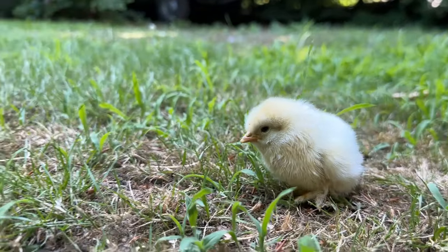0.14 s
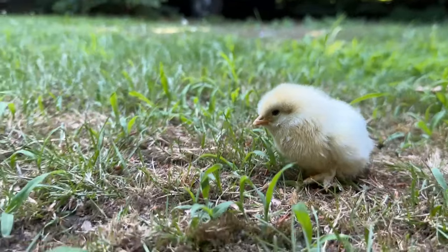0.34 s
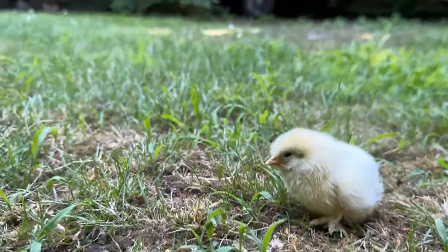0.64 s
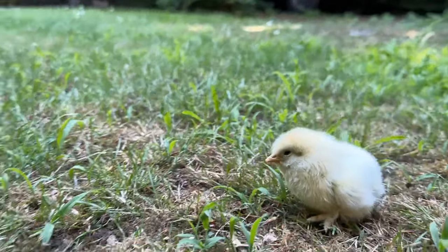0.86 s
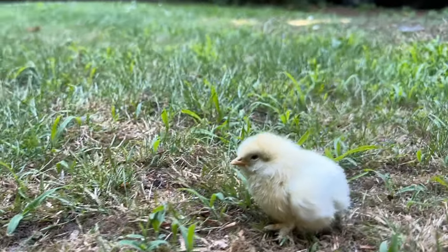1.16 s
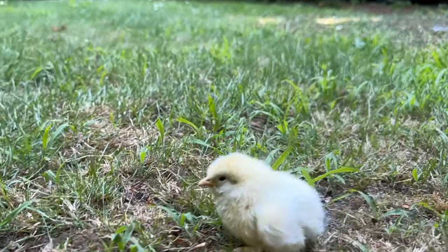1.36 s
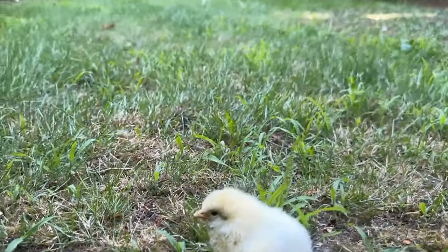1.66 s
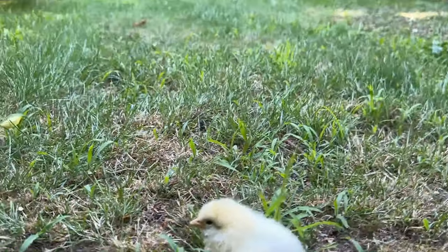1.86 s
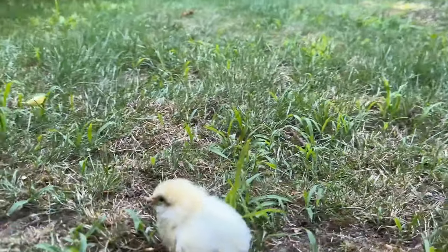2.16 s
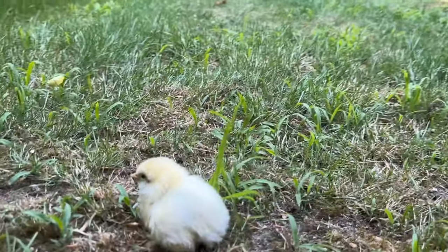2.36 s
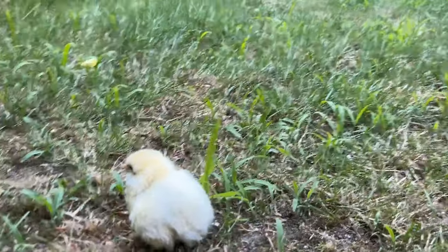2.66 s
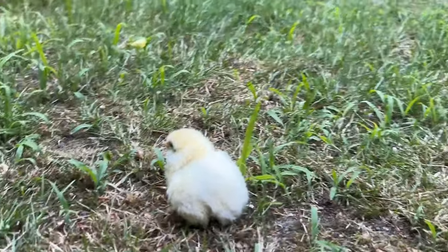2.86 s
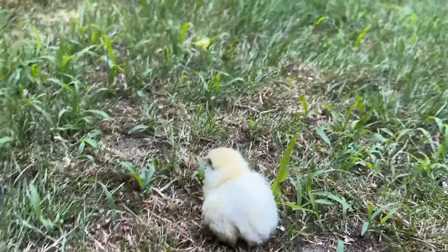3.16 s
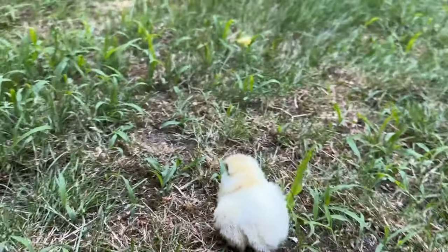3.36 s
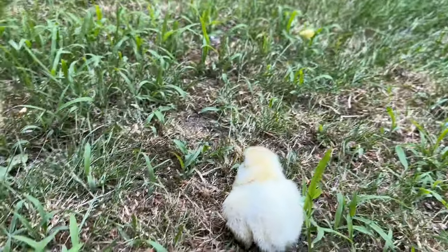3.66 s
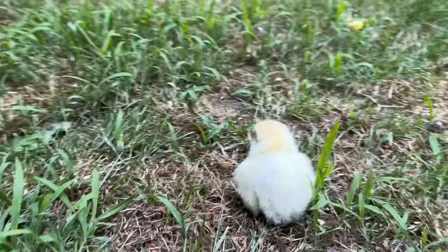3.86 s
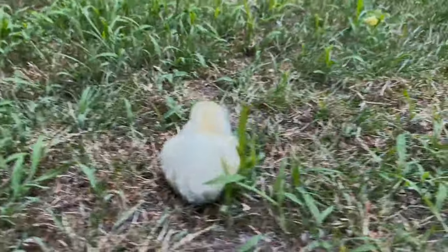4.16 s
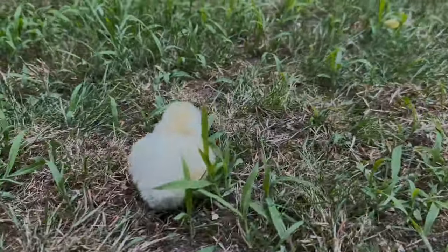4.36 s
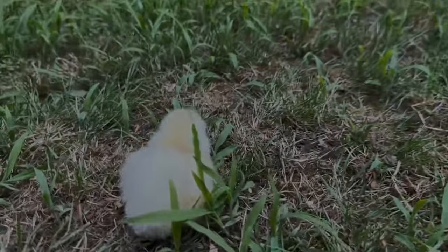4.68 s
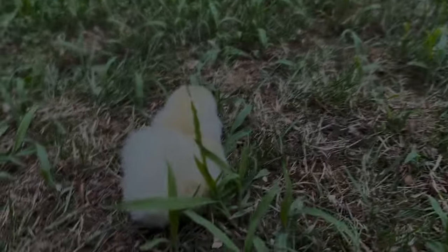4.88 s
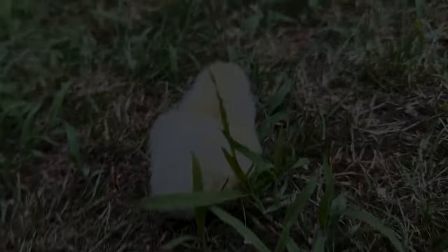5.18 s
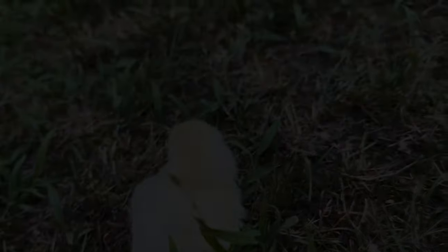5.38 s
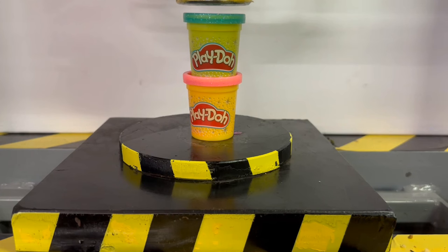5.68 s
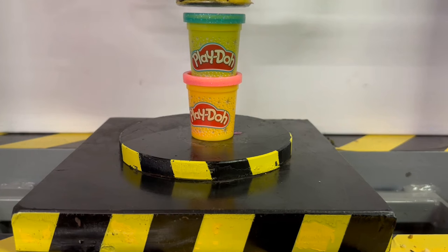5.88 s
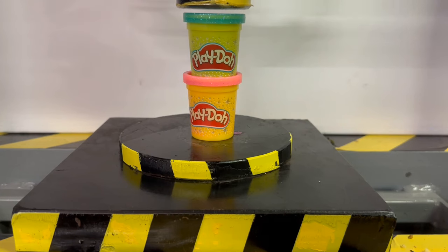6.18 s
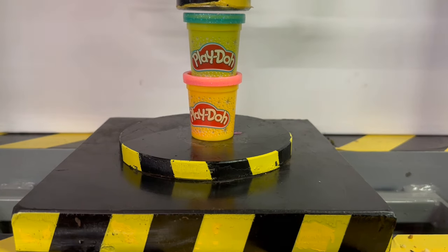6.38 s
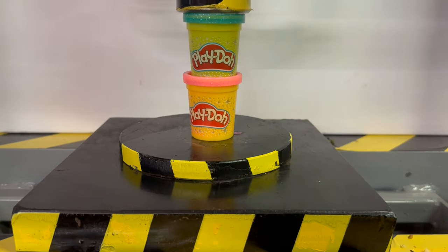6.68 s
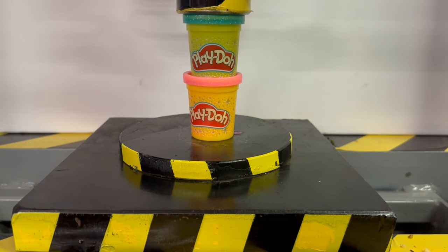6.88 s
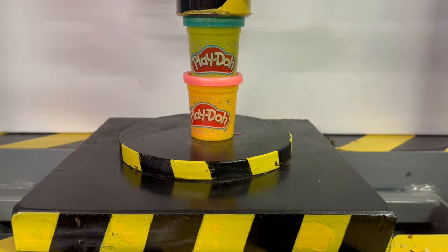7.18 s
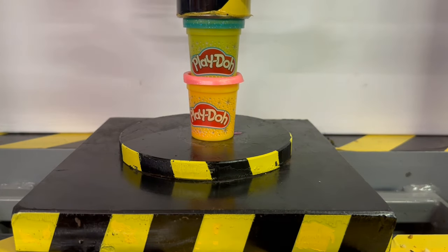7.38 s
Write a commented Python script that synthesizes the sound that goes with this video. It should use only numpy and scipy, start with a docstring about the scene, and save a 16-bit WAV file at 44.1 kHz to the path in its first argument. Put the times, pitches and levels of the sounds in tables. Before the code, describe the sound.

A chick peeps faintly over soft footsteps in grass and distant birds, then a hydraulic press suddenly runs with a loud, steady hum.

```python
"""A chick, then a hydraulic press

A chick peeps on a lawn, its syrinx gliding in pitch; far birds chirp, grass rustles underfoot and a
low outdoor rumble goes on. Then the scene changes at once to a workshop where a hydraulic press runs:
its pump hums at the orders of the shaft, knocks several times a turn into its resonant casing,
and oil hisses through the valves in spurts."""
import sys
import numpy as np
from scipy import signal
from scipy.fft import rfft, irfft
from scipy.io import wavfile

SR = 44100
rng = np.random.default_rng(int(sys.argv[2]) if len(sys.argv) > 2 else 0)


def dump_mix(stems):
    """Bounce the given channels to the path in sys.argv[1] as a 16-bit WAV at rate SR."""
    frames = np.atleast_2d(stems).T  # one column per channel
    limited = np.clip(frames, -1, 1)  # hard clip at full scale
    pcm = np.round(limited * 32767).astype(np.int16)
    wavfile.write(sys.argv[1], SR, pcm)


N = 332514
TIME = np.arange(N) / SR
PRESS_ON_S = 5.713
LOAD = np.clip((TIME - PRESS_ON_S) / (TIME[-1] - PRESS_ON_S), 0, 1)   # on the pump: 0 idle, 1 loaded
SIDES = np.array([[1], [-1]])   # left, right


def from_db(db):
    """Amplitude ratio of a level: a factor of ten per 20 dB."""
    return 10 ** (np.asarray(db) / 20)


def rms_one(x):
    """Normalisation to unit rms."""
    return x / np.sqrt(np.mean(x ** 2) + 1e-20)


def in_time(rows):
    """Linear interpolation in time, one curve per column after the first."""
    s, *columns = np.transpose(rows)
    return [np.interp(TIME, s, c) for c in columns]


def at_hz(points, hz):
    """Interpolation on a logarithmic frequency axis."""
    known_hz, values = np.transpose(points)
    return np.interp(np.log(hz + 1e-9), np.log(known_hz), values)


def drift(corner_hz):
    """Random modulation: low-passed Gaussian noise of unit rms."""
    r = np.exp(-80 * np.pi * corner_hz / SR)   # computed at SR / 40
    slow = signal.lfilter([1], [1, -2 * r, r * r], rng.standard_normal(N // 40 + 2002))[2000:]
    return np.interp(np.arange(N) / 40, np.arange(len(slow)), rms_one(slow))


def swell(s, rise_s, fall_s):
    """Gaussian envelope with separate widths before and after its peak."""
    return np.exp(-((TIME - s) / np.where(TIME < s, rise_s, fall_s)) ** 2 / 2)


def strokes(rows, rest_db):
    """Incoherent addition: the powers of overlapping swells sum above a resting level."""
    power = sum((from_db(db) * swell(s, rise_s, fall_s)) ** 2 for s, rise_s, fall_s, db in rows)
    return np.sqrt(from_db(rest_db) ** 2 + power)


def resonate(x, hz, width_hz):
    """A damped second-order resonator with unit peak gain."""
    r = np.exp(-np.pi * width_hz / SR)
    feedback = [1, -2 * r * np.cos(2 * np.pi * hz / SR), r * r]
    return signal.lfilter(np.array([1, 0, -1]) * (1 - r * r) / 2, feedback, x + 1e-18)


def noise(spectrum, correlation, grain_db=0, crackle=0, lag_ms=0):
    """Partly coherent stereo noise of rms about 1, with optional grain and random cracks."""
    hz = np.fft.rfftfreq(N, 1 / SR)
    cracks = crackle * (rng.random(N) < 60 / SR)
    grit = rng.standard_normal((2, N)) * (from_db(grain_db * drift(180)) + cracks)
    mid, side = rfft(grit) * from_db(at_hz(spectrum, hz))
    alike = np.clip(at_hz(correlation, hz), -.95, .99)
    mid, side = mid * np.sqrt(1 + alike), side * np.sqrt(1 - alike)
    pair = irfft([mid + side, (mid - side) * np.exp(-2j * np.pi * hz * lag_ms / 1000)], N)
    return pair / np.std(pair.mean(axis=0))


def echoes(x, t60):
    """Diffuse reverberation: convolution with decaying noise, independent at each ear."""
    t = TIME[:SR // 2]
    tail = rng.standard_normal((2, len(t))) * from_db(-60 * t / t60)
    return signal.fftconvolve(np.atleast_2d(x), tail / np.sqrt(np.sum(tail[0] ** 2)), axes=1)[:, :N]


def add(out, s, sound):
    """Superposition of a sound starting at time s."""
    at = max(round(s * SR), 0)
    out[at:at + len(sound)] += sound[:N - at]


def place(x, pan_db, lag_ms):
    """Interaural level and time differences: positive is louder and earlier on the left."""
    delayed = np.interp(TIME - lag_ms / 1000, TIME, x)
    return np.array([x, delayed]) * from_db(SIDES * pan_db / 2)


def note(hz, db):
    """A tapered sine whose phase is the integral of its frequency."""
    return from_db(db) * signal.windows.tukey(len(hz), .5) * np.sin(2 * np.pi * np.cumsum(hz) / SR)


# Sound field on the lawn: f/Hz, interaural correlation
LAWN_CORRELATION = [(60, 0.99), (400, 0.55), (1500, 0.25), (12000, 0.019)]
# Outdoor rumble and far hiss: f/Hz, relative spectral density/dB
RUMBLE_SPECTRUM = [(20, -21), (42, -8), (63, 3), (95, -11.5), (125, -6.5), (190, -19), (450, -25),
                   (1000, -39), (2200, -31), (5000, -49)]
def rumble(start_db=-53, rise_db_per_s=0.54):
    """Slowly growing noise, coherent between the ears at long wavelengths."""
    return from_db(start_db + rise_db_per_s * TIME) * noise(RUMBLE_SPECTRUM, LAWN_CORRELATION)


# Two-note chirps: t/s, duration/s, upper f/Hz, lower f/Hz, source level/dB
BIRD_CHIRPS = [(0, 0.052, 4470, 3350, -58.5), (0.106, 0.048, 5800, 4650, -57.5),
               (0.59, 0.092, 4450, 3250, -54.5), (1.219, 0.095, 4310, 3490, -53.5),
               (2.301, 0.088, 3980, 3200, -54), (3.438, 0.056, 4100, 4000, -53.5),
               (3.675, 0.085, 4400, 3390, -58), (3.965, .08, 4450, 3150, -55),
               (4.282, 0.083, 4450, 3300, -59), (4.968, 0.091, 4480, 3450, -59),
               (5.158, .097, 4200, 3370, -58), (5.451, .065, 4800, 3460, -59)]
# Whistles of other birds: t/s, duration/s, start f/Hz, end f/Hz, source level/dB
BIRD_WHISTLES = [(3.443, 0.043, 2400, 3750, -50.5), (3.485, .045, 2800, 3450, -54),
                 (3.548, 0.087, 2166, 2160, -50.5), (3.92, 0.136, 1813, 1875, -63.5),
                 (4.14, .12, 1940, 2380, -55.5)]
def far_birds(step_at=.5, step_width=0.182, rasp_depth=0.0664, direct_db=-3):
    """Frequency-modulated tones, stepping down or gliding, reverberate among the trees."""
    chirps, whistles = np.zeros((2, N))
    rasp = 1 + rasp_depth * drift(285)
    for s, length, upper_hz, lower_hz, db in BIRD_CHIRPS:
        u = np.linspace(0, 1, int(length * SR))
        stepped = (1 + np.tanh((u - step_at) / step_width)) / 2
        hz = upper_hz + (lower_hz - upper_hz) * stepped
        add(chirps, s, note(hz * rasp[int(s * SR):][:len(u)], db))
    for s, length, start_hz, end_hz, db in BIRD_WHISTLES:
        add(whistles, s, note(np.geomspace(start_hz, end_hz, int(length * SR)), db))
    trees = echoes(from_db(2.5) * chirps + from_db(-4) * whistles, t60=0.44)
    return from_db(direct_db) * (chirps + whistles) + trees


# Dead grass: f/Hz, relative spectral density/dB
THATCH_SPECTRUM = [(150, -5.5), (400, -1.5), (900, 2.5), (1800, 1.5), (2700, -3.5), (4500, -4.5),
                   (8000, -33)]
# Feet pressing it: peak t/s, rise/s, fall/s, relative level/dB
THATCH_TREADS = [(1.83, 0.055, 0.1, -51), (2.17, 0.062, 0.044, -64), (3.05, 0.13, 0.1, -60),
                 (3.59, 0.032, 0.023, -61.5), (3.87, 0.013, 0.017, -62), (4.3, 0.038, .05, -60.5),
                 (4.845, 0.02, 0.081, -60.5)]
def thatch(stir_db):
    """Amplitude-modulated crackling noise: dead grass crunches under each tread."""
    crunch = noise(THATCH_SPECTRUM, LAWN_CORRELATION, grain_db=2.0, crackle=9.7, lag_ms=0.19)
    return strokes(THATCH_TREADS, stir_db) * from_db(2.5) * crunch


# Grass blades, with clothing hiss at the top: f/Hz, relative spectral density/dB
BRUSH_SPECTRUM = [(1500, -10), (3200, -3), (5500, 6), (8000, 2.5), (10000, -9), (14000, -9)]
# Brushing strokes: peak t/s, rise/s, fall/s, relative level/dB, clothing hiss gain/dB
BRUSH_STROKES = [(1.23, 0.057, 0.064, -68, 5), (1.61, 0.042, 0.031, -65, 8), (1.86, 0.087, 0.13, -53, -13),
                 (1.98, 0.033, 0.044, -61, -14), (2.15, 0.034, 0.077, -63.5, 9.5),
                 (2.49, 0.075, .06, -72.5, 17), (2.84, 0.064, 0.043, -47.5, -0.5),
                 (3.02, 0.12, .25, -64.5, 12), (3.331, .02, 0.015, -54, 6), (3.6, 0.054, 0.073, -69.5, 20),
                 (3.7, 0.028, 0.017, -59.5, 14), (3.87, 0.035, 0.022, -61, 8), (4.3, 0.026, .045, -61, 17),
                 (4.66, 0.25, 0.16, -67.5, 15), (4.93, 0.095, 0.088, -60.5, 8),
                 (5.19, 0.092, 0.15, -64.5, 9)]
def brushing(stir_db, stir_hiss_db=2, hiss_above_hz=9300):
    """Friction noise: brushed grass swishes, with a high hiss of clothing or handling on each stroke."""
    friction = from_db(1) * noise(BRUSH_SPECTRUM, LAWN_CORRELATION, grain_db=1.5, crackle=6, lag_ms=0.206)
    hiss = signal.sosfiltfilt(signal.butter(4, hiss_above_hz, "high", fs=SR, output="sos"), friction)
    grass_gain = strokes([row[:-1] for row in BRUSH_STROKES], stir_db)
    hiss_rows = [(*timing, db + hiss_db) for *timing, db, hiss_db in BRUSH_STROKES]
    return grass_gain * (friction - hiss) + strokes(hiss_rows, stir_db + stir_hiss_db) * hiss


# Shoe scrapes: peak t/s, spread/s, f/Hz, bandwidth/Hz, level/dB
SOLE_SCUFFS = [(1.739, 0.019, 1750, 490, -45.5), (1.82, 0.017, 1790, 490, -40),
               (3.07, 0.21, 1080, 603, -52.5), (3.16, 0.017, 796, 600, -48)]
def scuffs(grain_db=3.5):
    """Sliding friction of a sole on dry ground gives a band of gritty noise."""
    out = np.zeros(N)
    for s, spread_s, hz, width_hz, db in SOLE_SCUFFS:
        grit = rng.standard_normal(N) * from_db(grain_db * drift(64))
        scrape = resonate(resonate(grit, hz, width_hz), hz, 2 * width_hz)
        out += from_db(db) * swell(s, spread_s, spread_s) * rms_one(scrape)
    return out


# Breaking stalks: t/s, peak level/dB, f/Hz, bandwidth/Hz, left minus right/dB
STALK_SNAPS = [(1.81, -40, 1800, 700, -3), (1.847, -42, 1100, 1800, -2), (2.001, -37, 1400, 1400, -12),
               (2.815, -40, 6580, 2500, 2), (2.945, -41, 1600, 1200, -2), (3.147, -40, 990, 400, -3),
               (4.529, -47, 1300, 2000, 0), (4.84, -38, 1100, 1800, 8), (4.854, -44, 1500, 3000, 2),
               (4.949, -38, 6500, 5000, 6), (4.961, -26.5, 6500, 1700, 10), (4.962, -42, 1200, 1400, -4),
               (5.084, -45, 6550, 6950, 9), (5.166, -41.5, 5040, 2500, 13), (5.306, -40.5, 6800, 2500, 11)]
def snaps(burst_s=.0015, tick=.35, ground_db=-8):
    """Brittle fracture of dry stalks: an impulse and a burst of grit excite a resonance."""
    out, t = np.zeros((2, N)), TIME[:SR // 4]
    for s, db, hz, width_hz, pan_db in STALK_SNAPS:
        burst = rng.standard_normal(len(t)) * np.exp(-t / burst_s)
        sound = resonate(burst + tick * (t == 0) * np.sqrt(SR / hz), hz, width_hz)
        for ear, side in zip(out, (1, -1)):
            add(ear, s, from_db(db + side * pan_db / 2) * sound / np.abs(sound).max())
    return out + from_db(ground_db) * echoes(out, t60=0.018)


# Steps: t/s, initial level/dB, f/Hz
SOIL_THUDS = [(3.251, -39, 213), (3.344, -34, 89.5), (5.327, -39.5, 280), (5.611, -33, 91)]
def footfalls(decay_cycles=1.5):
    """Heavily damped oscillation: soft soil answers each step with a dull thud."""
    out, t = np.zeros(N), TIME[:SR // 4]
    for s, db, hz in SOIL_THUDS:
        add(out, s, from_db(db) * np.exp(-t * hz / decay_cycles) * np.sin(2 * np.pi * hz * t))
    return out


# Stirring between strokes: t/s, relative thatch level/dB, relative brushing level/dB
GRASS_STIR = [(0, -77.5, -73.5), (.95, -70.5, -77.5), (1.3, -71.5, -71.5), (2.35, -70, -72.5),
              (2.6, -65.5, -63), (3.45, -62, -62), (4.1, -66, -69), (4.9, -65.5, -87), (5.65, -71.5, -69.5)]
def lawn(cross_s=2.2, pan_db=0.6):
    """Superposition of the sounds of walking and the outdoor rumble."""
    thatch_db, brushing_db = in_time(GRASS_STIR)
    grass = thatch(thatch_db) + brushing(brushing_db) + place(scuffs(), pan_db=-5, lag_ms=0.18)
    grass = np.where(TIME < cross_s, grass[::-1], grass)   # the feet pass to the other side
    return (rumble() + grass + snaps() + footfalls()) * from_db(SIDES * pan_db / 2)


# Peeps: t/s, duration/s, start f/Hz, top f/Hz, end f/Hz, level/dB, second voice re first/dB,
# skew (below 1 the top comes earlier)
CHICK_PEEPS = [(0.274, 0.055, 2330, 2920, 2080, -50, -5, 0.88),
               (0.445, 0.032, 2630, 2800, 2330, -56.5, -11, 1),
               (.818, 0.077, 2380, 3110, 2070, -52, -5.5, 0.92),
               (1.018, 0.057, 2920, 3480, 2370, -47.5, -27, 1.03),
               (1.311, 0.075, 2900, 3546, 2300, -44, -35, 0.97),
               (1.554, 0.076, 3120, 3485, 2500, -45.5, -35, 1.1),
               (1.909, 0.085, 3120, 3620, 2370, -43.5, -35, 1.44),
               (2.18, 0.092, 2900, 3650, 2230, -47, -35, 1.2)]
def chick(second_ratio=1.21, overtone_db=-15, falloff_db=-5, waver=0.012, flatness=2.4, softness=0.66):
    """Two-voice phonation: peeps arch in pitch, the syrinx's other side joining in the first ones."""
    out, wobble = np.zeros(N), 1 + waver * drift(170)
    for s, length, start_hz, top_hz, end_hz, db, second_db, skew in CHICK_PEEPS:
        u = np.linspace(0, 1, int(length * SR)) ** skew
        rise, fall = np.abs([top_hz - start_hz, top_hz - end_hz]) ** (1 / flatness)
        arch_hz = top_hz - np.abs(u * (rise + fall) - rise) ** flatness
        hz = arch_hz * wobble[int(s * SR):][:len(u)]
        phase = 2 * np.pi * np.cumsum(hz) / SR
        voice = np.sin(phase) + from_db(second_db) * np.sin(second_ratio * phase)
        overtones = sum(from_db(overtone_db + falloff_db * k) * np.sin((k + 2) * phase) for k in range(3))
        voice += 2 * u * (hz / top_hz) ** 3 * overtones   # brightest after the top of the arch
        envelope = np.abs(np.sin(np.pi * u)) ** softness
        add(out, s, np.sqrt(2) * from_db(db) * envelope * voice)
    return place(out, pan_db=5, lag_ms=0.048) + from_db(-8) * echoes(out, t60=0.084)


# Rushing oil: f/Hz, relative spectral density/dB
OIL_SPECTRUM = [(40, -7), (90, -3.5), (150, 1.5), (280, 2), (550, -1.5), (1200, 2.5), (1800, 10), (2600, 6),
                (3600, 1), (7000, 3.5), (9000, -1), (12000, 1.5), (14500, -7)]
# Its sound field: f/Hz, interaural correlation before clipping
OIL_CORRELATION = [(100, 0), (500, 2.5), (2000, -0.76), (4500, 0.13), (8000, 0), (13000, 0.3)]
# Valves: position/turn, spread/turn, f/Hz, linewidth/Hz, relative starting level/dB, growth/(dB/s)
VALVE_WHISTLES = [(.85, .036, 5900, 30, 1.2, 3), (.14, .045, 5900, 60, -6, 3), (.6, .16, 9980, 30, -1, .6),
                  (.6, .19, 9790, 70, -2.5, 0), (.66, .15, 8500, 180, -4.5, -1),
                  (.93, .05, 7200, 1200, -3, 0), (.6, .15, 11500, 2500, -7, 0)]
def oil_hiss(turn, surge_db=0.67, flutter_db=2.0):
    """Flow noise surges once a turn, and each valve whistles at its own shaft angle."""
    rush = noise(OIL_SPECTRUM, OIL_CORRELATION, grain_db=-1.0, lag_ms=-0.11)
    out = from_db(1.75 + surge_db * np.cos(2 * np.pi * (turn - .85))) * rush
    running_s = np.maximum(TIME - PRESS_ON_S, 0)
    ear_phase = np.array([[0], [np.pi / 2.5]])
    for where, spread, hz, width_hz, db, growth in VALVE_WHISTLES:
        away = (turn - where + .5) % 1 - .5
        opening = np.exp(-(away / spread / 2) ** 2)
        # a random walk in phase broadens the spectral line
        wander = np.cumsum(rng.standard_normal(N)) * np.sqrt(2 * np.pi * width_hz / SR)
        gain = from_db(db + growth * running_s + flutter_db * drift(32))
        out += gain * opening * np.sin(2 * np.pi * hz * TIME + wander + ear_phase)
    return out


# Whines: shaft order, peak t/s, spread/s, level/dB
CASING_WHINES = [(30, 6.7, .35, -49), (38, 7.1, .25, -50), (39, 5.95, .15, -43), (40, 5.75, .1, -43),
                 (40, 7.4, .2, -46), (43, 7.5, .1, -47), (47, 6.25, .2, -47), (47, 6.74, .11, -39),
                 (48, 5.75, .12, -37)]
def pump_whines(turn, knocks, waver_db=2.0):
    """Forced vibration: high orders swell out of the casing, in phase with the knocks that drive them."""
    out = np.zeros(N)
    for order, s, spread_s, db in CASING_WHINES:
        rotor = np.exp(2j * np.pi * order * turn)
        envelope = swell(s, spread_s, spread_s)
        drive = np.sum(knocks * envelope / rotor)   # Fourier component of the knocks at this order
        tone = np.sqrt(2) * np.real(rotor * drive / np.abs(drive))
        out += from_db(db + waver_db * drift(28)) * envelope * tone
    return out


# Knocks: position/turn, shift under load/turn, idle drive/dB, loaded drive/dB, f/Hz, bandwidth/Hz
CASING_KNOCKS = [(.936, -.011, -22, -21.2, 2290, 160), (.99, -.01, -28, -27, 700, 400),
                 (.027, -.021, -24.4, -21.6, 1650, 170), (.036, -.004, -19, -23, 1800, 1000),
                 (.153, -.015, -28.1, -21.6, 2020, 180), (.186, -.02, -21.3, -26.1, 1680, 80),
                 (.341, -.02, -25, -29.2, 1920, 70), (.415, -.021, -31.3, -32, 1620, 70),
                 (.54, 0, -21, -30.6, 1730, 70), (.642, 0, -29.3, -31.3, 2400, 200)]
def pump_knocks(turn, uneven_db=0.25, jitter_turns=0.0001, band_hz=(700, 3200)):
    """Periodic impacts ring the casing's modes; load shifts their timing and strength."""
    out, step = np.zeros(N), np.gradient(turn)
    for where, shift, idle_db, loaded_db, hz, width_hz in CASING_KNOCKS:
        away = (turn - where - shift * LOAD + jitter_turns * drift(40) + .5) % 1 - .5
        db = idle_db + (loaded_db - idle_db) * LOAD + uneven_db * drift(19)
        clicks = np.maximum(1 - np.abs(away) / step, 0) * from_db(db)
        out += resonate(clicks, hz, width_hz) * SR / (2 * np.pi * width_hz)
    return signal.sosfilt(signal.butter(2, band_hz, "band", fs=SR, output="sos"), out)


# Partials of the hum: shaft order, relative idle level/dB, relative loaded level/dB
HUM_ORDERS = [(2.98, -33, -36), (4.01, -22, -24), (5, -25, -26), (5.996, 0, 0.5), (7, -17.5, -18),
              (8, -19.5, -16.5), (9, -21, -23.5), (10, -21, -19.5), (11.01, -11, -14), (12, -27, -36),
              (13, -31.5, -24), (14, -29.5, -24.5), (16, -33.5, -24.5), (17, -29, -25.5), (18, -30, -31),
              (19, -24, -45), (20, -22, -24), (21, -30, -30), (22, -29, -29.5), (23, -34, -20.5),
              (24, -34.5, -29), (26.2, -35, -31.5)]
def pump_hum(turn, waver_db=0.5, spread=0.48):
    """Pressure ripple sounds near whole orders of the shaft; the sixth is by far the strongest."""
    out = np.zeros((2, N))
    for order, idle_db, loaded_db in HUM_ORDERS:
        phase, offset = rng.random(2)
        db = idle_db + (loaded_db - idle_db) * LOAD
        depth_db = waver_db * np.log(order + 1) / np.log(20) * (db < -6)   # only weak orders waver
        ear_phase = spread * order / 10 * (offset - .5) * SIDES
        tone = np.sin(2 * np.pi * (order * turn + phase) + ear_phase)
        out += from_db(db + depth_db * drift(0.94)) * tone
    return rms_one(out)


# Pump shaft: t/s, rotation f/Hz
SHAFT_SPEED = [(5.7, 40.25), (6.05, 40.735), (6.45, 40.92), (6.7, 40.92), (7.05, 40.99), (7.54, 40.885)]
# Pump effort: t/s, hum gain/dB, knock gain/dB, hiss gain/dB
PUMP_EFFORT = [(5.76, -24, 1, -36), (6.05, -23, 0, -35), (6.75, -22.5, 0, -35), (7.5, -21.5, -1, -35)]
# Workshop stereo balance: f/Hz, left minus right/dB
WORKSHOP_BALANCE = [(400, 1), (750, 0), (1400, -2), (2600, 2), (4500, -2.5), (12000, 0.5)]
def press(turn_zero_s=5.728, walls_db=-11):
    """Phase locking: the shaft angle times the hum, knocks, whines and spurts of oil."""
    turn = np.cumsum(in_time(SHAFT_SPEED)[0]) / SR
    turn -= np.interp(turn_zero_s, TIME, turn)
    hum_db, knock_db, hiss_db = in_time(PUMP_EFFORT)
    knocks = from_db(knock_db) * pump_knocks(turn)
    casing = knocks + pump_whines(turn, knocks)
    out = place(casing, pan_db=4.5, lag_ms=0.067) + from_db(walls_db) * echoes(casing, t60=.22)
    out += from_db(hum_db + 0.22) * pump_hum(turn) + from_db(hiss_db) * oil_hiss(turn)
    balance_db = at_hz(WORKSHOP_BALANCE, np.fft.rfftfreq(N, 1 / SR))
    return irfft(rfft(out) * from_db(SIDES * balance_db / 2), N)


def scene(fade_s=0.0023):
    """A very short linear crossfade leads from the lawn to the workshop."""
    indoors = np.clip((TIME - PRESS_ON_S) / fade_s, 0, 1)
    return (1 - indoors) * (chick() + far_birds() + lawn()) + indoors * press()


def record(dry, cutoff_hz=14550):
    """Band limiting: an elliptic low-pass cuts the top steeply."""
    return signal.sosfilt(signal.ellip(12, .1, 80, cutoff_hz, fs=SR, output="sos"), dry)


dry = scene()
out = record(dry)
dump_mix(out)
```